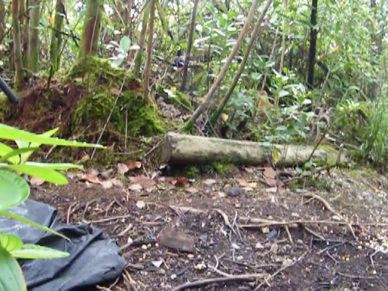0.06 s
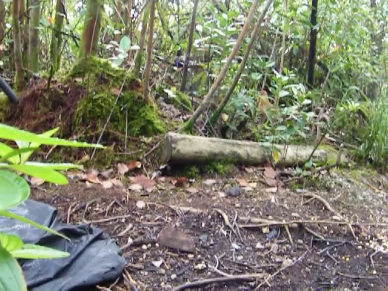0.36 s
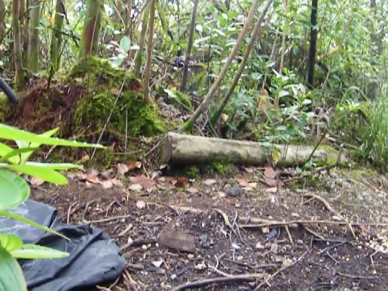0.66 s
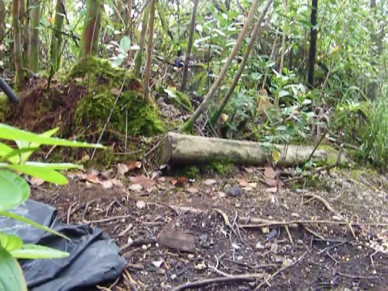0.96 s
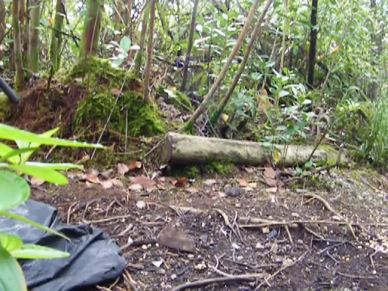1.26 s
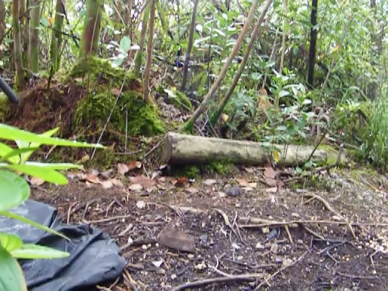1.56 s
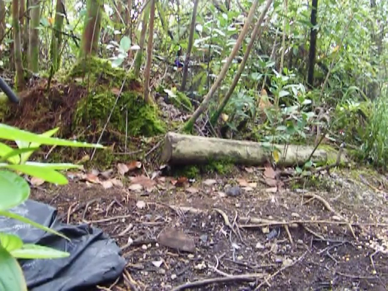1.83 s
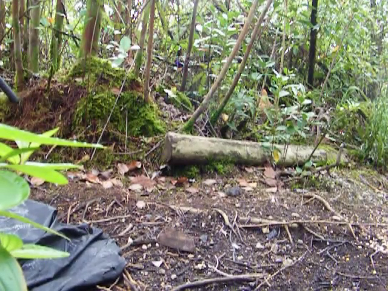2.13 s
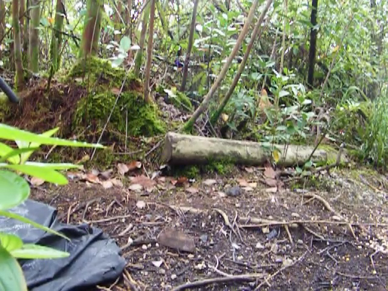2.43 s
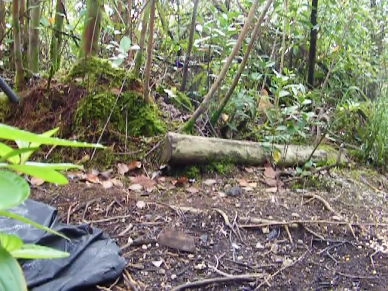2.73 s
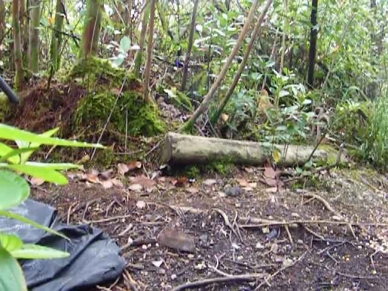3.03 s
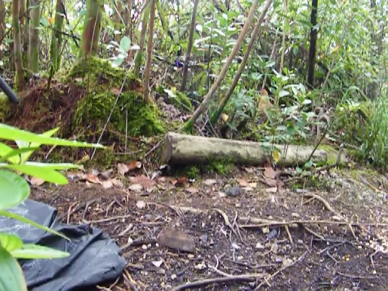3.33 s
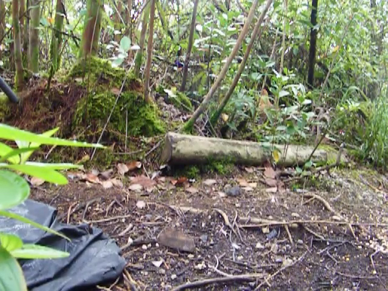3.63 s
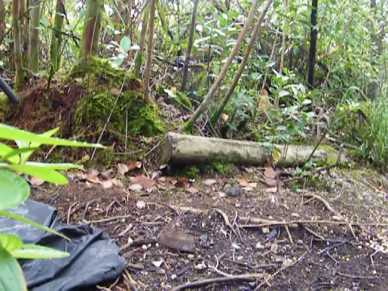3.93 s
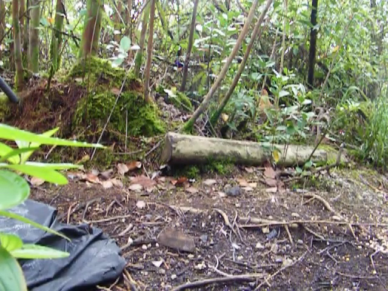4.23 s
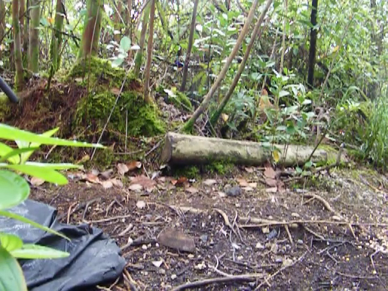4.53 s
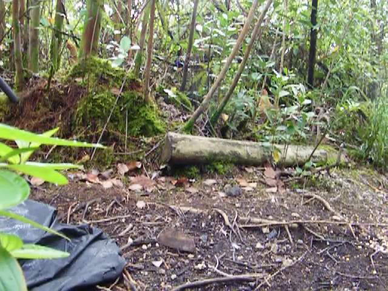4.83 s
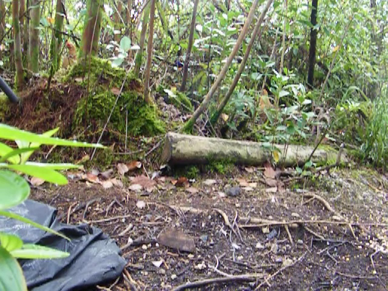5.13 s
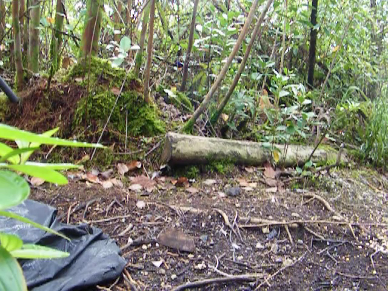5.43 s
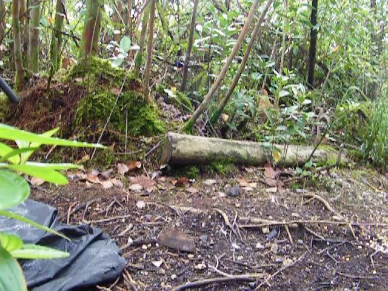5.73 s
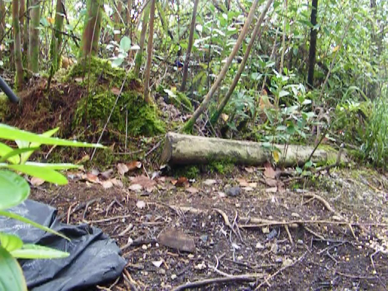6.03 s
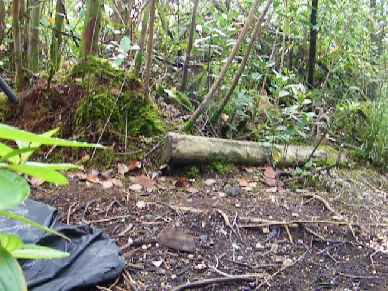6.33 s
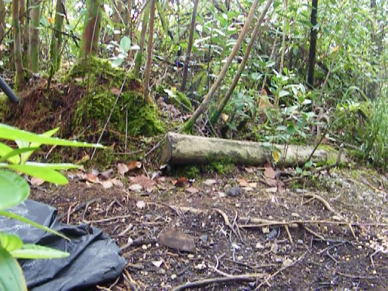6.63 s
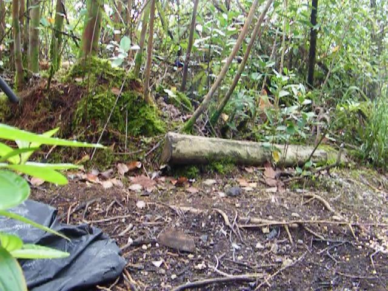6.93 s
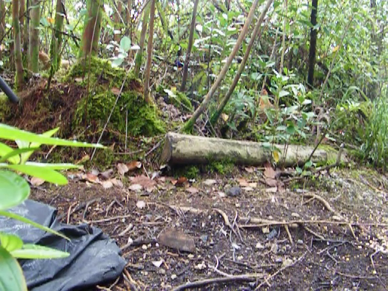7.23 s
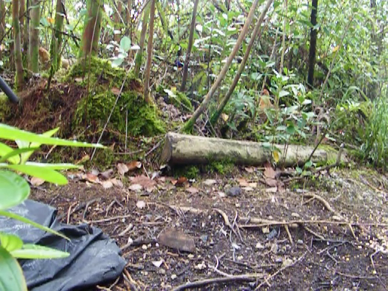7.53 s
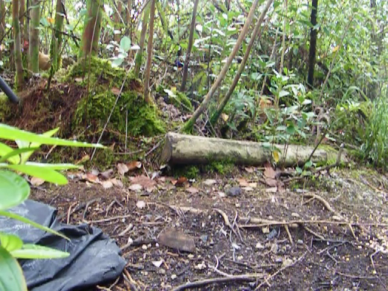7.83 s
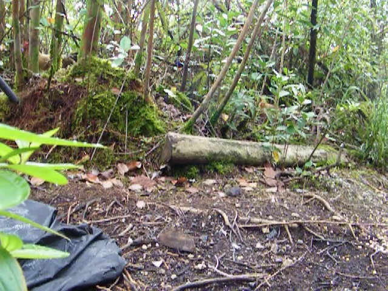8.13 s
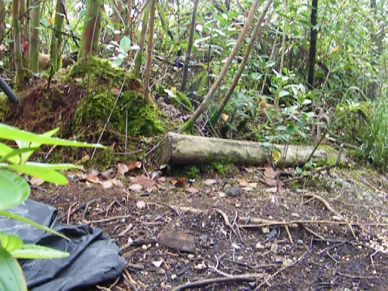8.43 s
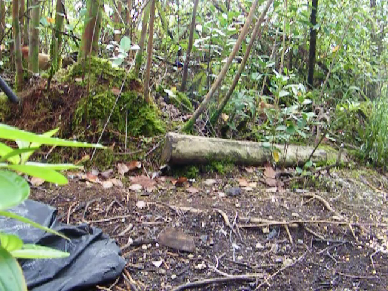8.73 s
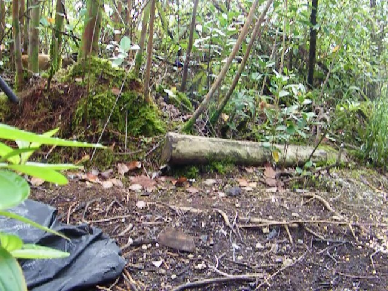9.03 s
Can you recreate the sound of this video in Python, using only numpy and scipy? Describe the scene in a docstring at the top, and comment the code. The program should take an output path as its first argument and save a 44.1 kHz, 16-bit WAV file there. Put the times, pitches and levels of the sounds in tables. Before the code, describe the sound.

Something rummages through dry leaves and twigs on a woodland floor, close to the microphone. Stalks snap in uneven bursts, each a bright crack with a hollow knock, while leaves scuff and crinkle and the soil takes an occasional soft thud. The activity is busy at first and thins out in the second half. Small birds whistle faintly far away, over a low rumble of air and a thin, steady high whine.

```python
"""A woodland floor, up close: something rummages through dry leaves and twigs.
Stalks give way in uneven bursts, each with a bright crack and a hollow knock. Leaves scuff and
crinkle with every push, and now and then the soil takes a soft thud.
Small birds whistle far off through the trees; still air and a thin high whine sit behind it all."""
import sys
import numpy as np
from scipy import signal
from scipy.fft import rfft, irfft, next_fast_len
from scipy.io import wavfile

SR = 44100
rng = np.random.default_rng(int(sys.argv[2]) if len(sys.argv) > 2 else 0)


def unload_audio(sound):
    """Save the sound as a 16-bit wav file, at the path given as the first command line argument."""
    columns = np.transpose(np.atleast_2d(sound))
    # keep every value between -1 and 1, then stretch to whole-number steps
    steps = np.round(np.clip(columns, -1, 1) * 32767)
    wavfile.write(sys.argv[1], SR, steps.astype(np.int16))


N = 404397
TIME = np.arange(N) / SR
BURST_TIME = np.arange(8192) / SR   # seconds within one short sound

# Tone of the still air, mostly low rumble. Each row: frequency in Hz, gain in dB.
AIR_EQ = [(20, -3.5), (45, 19.5), (66, 20.5), (100, 12.5), (330, 1.5), (530, -2.5), (700, -9.5), (820, 4.5),
          (1000, -4.5), (2000, -6), (5000, -4.5), (7700, -6), (9000, -7)]
# Tone of the whine, a narrow band near 6.4 kHz. Each row: frequency in Hz, gain in dB.
WHINE_EQ = [(4800, -40), (5600, -20), (5900, -13), (6150, -6), (6260, -4), (6335, 2), (6410, -5), (6475, 1),
            (6570, -3), (6660, -20), (7000, -45)]
# Distant bird notes. Each row: start in seconds, length in seconds, opening pitch in Hz,
# closing pitch in Hz, relative level in dB.
BIRD_NOTES = [(1.218, 0.07, 4970, 4340, -57), (1.466, 0.074, 5760, 4500, -58),
              (2.692, 0.089, 2730, 2938, -57), (5.39, 0.058, 5102, 4270, -61),
              (5.789, 0.21, 6380, 3986, -56), (6.017, 0.074, 2860, 3014, -54),
              (6.142, 0.12, 5540, 3540, -55), (7.505, 0.1, 4540, 4330, -60), (7.99, 0.073, 5120, 5200, -57),
              (8.057, 0.049, 5480, 5740, -55), (8.399, 0.14, 2647, 3022, -55.5)]
# Weight landing on the soil. Each row: start in seconds, relative level in dB, pitch in Hz.
SOIL_THUDS = [(1.599, -19, 130), (1.758, -22.5, 51.66), (2.287, -27, 159.2), (2.637, -23, 70.4),
              (3.31, -23, 54.4), (4.365, -13, 64.3), (4.603, -23, 99.3), (7.265, -21.5, 104.9)]
# Bass-heavy tone of the soil. Each row: frequency in Hz, gain in dB.
SOIL_EQ = [(20, -44.5), (45, 1), (62, 7.5), (120, 9.5), (200, -15), (600, -27.5)]
# Faint stirring between the pushes. Each row: time in seconds, relative level in dB.
STIRRING = [(0, -45), (1.5, -35), (2.4, -42.5), (3.6, -41.5), (4.4, -39), (5.15, -50.5), (5.8, -41.5),
            (7.3, -47.5), (8.05, -63), (9.17, -41.5)]
# Pushes through the leaf litter. Each row: start in seconds, length in seconds, relative level in dB.
PUSHES = [(0.02, 0.089, -31), (0.214, 0.099, -26.5), (0.396, .16, -30), (0.734, .2, -27.5),
          (1.13, 0.1, -26.5), (1.326, .16, -36), (1.533, 0.19, -32), (1.883, 0.2, -28.5),
          (2.145, 0.13, -34), (2.528, 0.19, -33), (2.836, 0.11, -37.5), (3.079, 0.13, -33.5),
          (3.214, .3, -29), (3.551, 0.24, -41.5), (3.97, 0.12, -35), (4.326, 0.093, -38.5),
          (4.546, 0.042, -34.5), (4.606, 0.13, -22), (5.383, .04, -42), (5.517, 0.078, -33),
          (5.604, 0.074, -29), (5.736, 0.088, -38), (6.065, .11, -36.5), (6.46, 0.14, -48),
          (6.917, 0.047, -28), (7.088, 0.047, -33), (7.374, 0.048, -36.5), (8.256, .07, -46.5),
          (8.482, 0.068, -43), (9.142, 0.024, -39)]
# Dry tone of crinkling leaves. Each row: frequency in Hz, gain in dB.
CRINKLE_EQ = [(1000, -15.5), (2000, -4.5), (2700, 1), (5000, -2), (5900, -10.5), (7600, -1.5), (9000, -9.5)]
# Hollow tone of the knocks and scuffs. Each row: frequency in Hz, gain in dB.
KNOCK_EQ = [(40, 4.5), (70, 7), (200, 0), (290, 0.5), (375, 3), (470, -1.5), (550, -0.5), (780, -1.5),
            (920, -7.5), (1220, -1), (1380, -4), (1650, -5), (1850, -10.5), (4000, -21.5)]
# Bright tone of the cracks. Each row: frequency in Hz, gain in dB.
CRACK_EQ = [(600, -25), (2050, -0.5), (2600, 4), (3300, -1), (4200, -4), (5000, -1.5), (5800, -4),
            (6800, 0), (7700, 2), (9000, 2)]
# The twig and leaf breaks that stand out. Each row: start in seconds, break time in seconds,
# relative knock level in dB, knock centre in Hz, relative crack level in dB.
FEATURED_BREAKS = [(0.039, 0.00074, -30, 1040, -25), (0.201, 0.004, -27.5, 590, -27.5),
                   (0.255, 0.00099, -25, 656, -20.5), (0.39, 0.016, -26, 505, -29.5),
                   (0.429, 0.0012, -20.5, 655, -28), (0.496, 0.0013, -39, 500, -24.5),
                   (0.609, 0.00049, -27.5, 1040, -27), (0.627, 0.00073, -23, 980, -17),
                   (0.76, 0.003, -23.5, 670, -44), (0.804, 0.00099, -40, 570, -26.5),
                   (0.87, 0.0012, -47, 400, -24), (0.879, 0.0035, -20.5, 490, -17),
                   (1.004, 0.003, -30.5, 970, -21.5), (1.04, 0.0025, -30, 620, -22),
                   (1.105, 0.00061, -31.5, 710, -24), (1.128, 0.0009, -39, 589.5, -27),
                   (1.313, .0015, -33.5, 610, -28.5), (1.329, 0.0014, -24, 790, -22),
                   (1.428, 0.0024, -26.5, 670, -28.5), (1.48, .0013, -34, 470, -32),
                   (1.581, 0.0014, -19, 561, -24.5), (1.598, 0.0013, -25.5, 608.7, -22),
                   (1.747, .0019, -30.5, 583, -24.5), (1.859, .0005, -32.5, 810, -23),
                   (1.886, 0.0022, -23.5, 680, -27), (1.939, 0.0011, -24.5, 1048, -26.5),
                   (1.969, 0.0019, -21.5, 745, -24), (1.985, .0024, -26, 685, -24),
                   (2.026, 0.0024, -20.5, 665, -14.5), (2.191, 0.015, -27, 470, -27.5),
                   (2.311, 0.002, -35, 800, -30.5), (2.401, 0.0031, -30.5, 630, -32.5),
                   (2.492, 0.009, -26.5, 626.5, -41), (2.638, 0.0051, -21, 537, -26),
                   (2.737, .018, -25.5, 450, -51), (3.065, 0.0017, -20.5, 630, -31.5),
                   (3.158, 0.0082, -23.5, 494.2, -24.5), (3.228, .0037, -25, 698, -24),
                   (3.245, 0.0028, -22, 878, -19), (3.312, 0.011, -22, 820, -23.5),
                   (3.383, 0.0025, -25.5, 1030, -31), (3.424, 0.0033, -27, 800, -29.5),
                   (3.559, 0.0015, -26.5, 510, -31), (3.611, 0.0025, -31, 735.2, -35.5),
                   (3.668, 0.0029, -26.5, 720, -36), (3.817, 0.0014, -17, 1020, -17.5),
                   (4.03, 0.0022, -18, 980, -15.5), (4.164, 0.0015, -36.5, 1140, -29.5),
                   (4.275, 0.0039, -31, 683, -24), (4.31, 0.011, -24, 630, -31.5),
                   (4.351, 0.0067, -18.5, 597, -23), (4.365, 0.0012, -21.5, 558.8, -34),
                   (4.597, 0.0046, -22, 790, -23), (4.641, 0.0011, -25.5, 590.4, -25),
                   (4.697, 0.0069, -24.5, 479.4, -46), (4.932, 0.011, -29, 512.8, -41),
                   (5.025, 0.0041, -29.5, 410, -41), (5.303, 0.012, -29, 475.6, -41),
                   (5.495, .0038, -31, 573.6, -30.5), (5.627, 0.00096, -28, 740, -19.5),
                   (5.698, 0.0016, -21.5, 611.4, -21), (5.905, 0.0062, -27.5, 624, -31),
                   (6.01, 0.0057, -28.5, 742, -27.5), (6.121, 0.0035, -25.5, 445.3, -53),
                   (6.238, 0.0012, -37.5, 1097, -25.5), (6.38, 0.009, -27, 710, -26.5),
                   (6.676, 0.0023, -32.5, 646.3, -24), (6.91, 0.0009, -24.5, 855.4, -18.5),
                   (6.982, 0.0012, -29.5, 540, -24.5), (7.007, 0.00075, -29, 650, -24),
                   (7.058, 0.001, -38, 610, -27.5), (7.21, 0.0012, -30, 531.2, -26),
                   (7.288, .0016, -32, 458, -55), (7.432, 0.00074, -28, 871, -30),
                   (7.489, 0.0019, -43, 1178, -29), (7.558, 0.0024, -31, 445, -50),
                   (7.674, 0.0013, -22.5, 960, -16.5), (7.699, 0.0007, -27, 960, -18),
                   (7.72, 0.0016, -22, 740, -17), (7.774, 0.00097, -36, 700, -25.5),
                   (7.802, 0.0055, -35.5, 725, -36.5), (7.914, 0.002, -44, 696, -48),
                   (8.179, 0.0019, -44, 406.7, -42), (8.41, 0.0035, -31, 820, -34),
                   (8.669, 0.0027, -41.5, 501.6, -63), (8.771, 0.012, -42.5, 760, -35),
                   (8.806, 0.0013, -26.5, 650, -33.5), (8.999, 0.008, -33.5, 564, -44.5),
                   (9.109, 0.00089, -45, 840, -25.5)]


def from_db(db):
    """Decibels to gain."""
    return 10 ** (np.asarray(db) / 20)


def unit_rms(x):
    """Scale to an rms of 1."""
    return x / np.sqrt(np.mean(x ** 2) + 1e-20)


def at_level(burst, db, samples=353):
    """Set a burst's gain by the rms level of its attack."""
    return from_db(db) * burst / np.sqrt(np.mean(burst[:samples] ** 2))


def add(track, start_s, sound):
    """Lay a sound into the track."""
    i = max(round(start_s * SR), 0)
    track[i:i + len(sound)] += sound[:max(N - i, 0)]


def drift(turns_per_s):
    """A smooth random modulator with an rms of 1."""
    knots = rng.standard_normal(int(turns_per_s * N / SR) + 2)
    return unit_rms(np.interp(TIME * turns_per_s, np.arange(len(knots)), knots))


def equalise(x, curve, centre_hz=1000, focus_db=0):
    """Minimum-phase EQ, so attacks stay sharp; focus_db is an extra cut one octave from the centre."""
    size = 2 * next_fast_len(len(x) // 2 + 1)
    octave = np.log2(np.maximum(np.arange(size // 2 + 1) * SR / size, 1))
    hz, db = np.transpose(curve)
    off_centre = np.log2(1 + (octave - np.log2(centre_hz)) ** 2)
    gain = from_db(np.interp(octave, np.log2(hz), db) - focus_db * off_centre)
    cepstrum = irfft(np.log(gain))
    cepstrum[1:size // 2] *= 2
    cepstrum[size // 2 + 1:] = 0
    return irfft(rfft(x, size) * np.exp(rfft(cepstrum)))[:len(x)]


def air_and_whine(air_db, whine_db):
    """The bed: still outdoor air and a steady, narrow band of high noise."""
    air = unit_rms(equalise(rng.standard_normal(N), AIR_EQ))
    whine = unit_rms(equalise(rng.standard_normal(N), WHINE_EQ))
    return from_db(air_db) * air + from_db(whine_db) * whine


def birds(gain_db, waver, scatter_s):
    """Thin, wavering whistles slide to their closing pitch and arrive mostly scattered by the trees."""
    direct = np.zeros(N)
    for start, length, open_hz, close_hz, db in BIRD_NOTES:
        progress = np.linspace(0, 1, int(length * SR))
        glide_hz = close_hz + (open_hz - close_hz) * (1 - progress) ** 2
        hz = glide_hz * (1 + waver * drift(180)[:len(progress)])
        swell = np.sqrt(np.abs(np.sin(np.pi * progress)))
        whistle = swell * np.sin(2 * np.pi * np.cumsum(hz) / SR)
        add(direct, start, from_db(db + gain_db) * unit_rms(whistle))
    trees = rng.standard_normal(len(BURST_TIME)) * np.exp(-BURST_TIME / scatter_s)
    scattered = signal.fftconvolve(direct, trees / np.sqrt(np.sum(trees ** 2)))[:N]
    return 0.5 * direct + scattered


def fracture(decay_s, tail_db, tail_s, swell, grit):
    """A run of tiny uneven slips that builds and dies, then a softer tail as the litter settles."""
    run = np.exp(-BURST_TIME / decay_s) * (1 - np.exp(-BURST_TIME / (swell * decay_s)))
    settling = from_db(tail_db) * np.exp(-BURST_TIME / tail_s)
    steps = rng.standard_normal(len(BURST_TIME) // 64).clip(-2, 2)
    roughness = np.exp(grit * np.repeat(steps, 64))
    slips = unit_rms(roughness) * rng.standard_normal(len(BURST_TIME))
    return (run + settling) * slips


def soil_thuds(gain_db):
    """Soft soil answers a weight in the bass: a dull crunch and a few dying swings."""
    track = np.zeros(N)
    for start, db, hz in SOIL_THUDS:
        swing = np.sin(2 * np.pi * hz * BURST_TIME) * np.exp(-BURST_TIME / 0.036)
        crunch = fracture(decay_s=0.0049, tail_db=-24, tail_s=0.024, swell=0.33, grit=0.17)
        thud = unit_rms(swing) + unit_rms(equalise(crunch, SOIL_EQ))
        add(track, start, at_level(thud, db + gain_db, samples=1000))
    return track


def push_envelope(attack_s, release_s):
    """How hard the litter is stirred, as a gain: each push builds quickly, holds and lets go."""
    t = TIME[::64]
    power = from_db(np.interp(t, *np.transpose(STIRRING))) ** 2
    for start, length, db in PUSHES:
        fade = np.maximum(start - t, 0) / attack_s + np.maximum(t - start - length, 0) / release_s
        power += (from_db(db) * np.exp(-fade)) ** 2
    return np.interp(TIME, t, np.sqrt(power))


def grains(per_s, spread_db, clump_db, clumps_per_s):
    """Random clicks, most small and a few large, swelling in clumps."""
    clumps = from_db(clump_db * drift(clumps_per_s).clip(-2, 1.5))
    sizes = from_db(spread_db * np.minimum(rng.exponential(1, N), 4))
    hits = rng.random(N) < per_s / SR
    return hits * clumps * sizes * rng.choice([-1, 1], N)


def leaf_rustle(envelope, scuff_db, crinkle_db):
    """Leaves slide and crumple: dull scuffs of four sizes under a fine dry crinkle."""
    scuffs = np.zeros(N)
    for hz in np.geomspace(160, 750, 4):
        coarse = grains(per_s=820, spread_db=3.5, clump_db=7, clumps_per_s=62)
        scuffs += equalise(coarse, KNOCK_EQ, hz, focus_db=7.5)
    nudges = from_db(1.56 * drift(45).clip(-2, 1.5))   # one nudge moves all sizes together
    fine = grains(per_s=5000, spread_db=4.5, clump_db=8, clumps_per_s=91)
    crinkle = unit_rms(equalise(fine, CRINKLE_EQ) * np.sqrt(nudges))
    return envelope * (from_db(scuff_db) * unit_rms(scuffs * nudges) + from_db(crinkle_db) * crinkle)


def small_breaks(per_s):
    """Little pieces give way unevenly during each push and follow its level; rows as FEATURED_BREAKS."""
    rows = []
    for start, length, push_db in PUSHES:
        count = max(round(per_s * length), 1)
        for onset in start + length * (np.arange(count) + rng.random(count)) / count:
            size, dryness = rng.standard_normal(2).clip(-2, 2)
            knock_db = push_db - 3 + 2.5 * size
            hardness_db = -5 + 4 * dryness   # crack level over knock level
            break_s = 0.0015 * 2 ** (-0.2451 * hardness_db)   # a harder piece parts sooner
            knock_hz = 630 * 2 ** (0.3 * hardness_db)   # and knocks higher
            rows.append((onset, break_s, knock_db, knock_hz, knock_db + hardness_db))
    return rows


def ringing(burst, hz, cycles, mix):
    """The broken piece rings for a few cycles near its own pitch, blended under the burst."""
    angle = 2 * np.pi * hz * 2 ** rng.normal(0, 0.38) / SR
    radius = np.exp(-angle / (2 * np.pi * cycles))
    ring = signal.lfilter([1, 0, -1], [1, -2 * radius * np.cos(angle), radius ** 2], burst)
    return unit_rms(burst) + mix * unit_rms(ring)


def knock(break_s, centre_hz):
    """The hollow body of a break; a slow crumple keeps it going longer."""
    slips = fracture(decay_s=0.0061 + 1.22 * break_s, tail_db=-9, tail_s=0.018, swell=0.11, grit=0.16)
    return equalise(slips, KNOCK_EQ, centre_hz, focus_db=3.5)


def crack(break_s, typical_hz=4023, spread_octaves=0.11):
    """The bright edge of a break: fibres part and the piece rings, no two alike."""
    hz = typical_hz * 2 ** (spread_octaves * rng.standard_normal())
    slips = fracture(decay_s=1.4 * break_s, tail_db=-20, tail_s=0.018, swell=0.074, grit=0.49)
    slips[0] += 3.87   # the first fibre's click: clear in a quick break, buried in a slow one
    return equalise(ringing(slips, hz, cycles=6.3, mix=0.068), CRACK_EQ, hz, focus_db=10)


def snaps(breaks, knock_gain_db, crack_gain_db):
    """Each break layers a crack over a knock: twigs part at once, leaves crumple slowly."""
    track = np.zeros(N)
    for start, break_s, knock_db, knock_hz, crack_db in breaks:
        body = at_level(knock(break_s, knock_hz), knock_db + knock_gain_db)
        edge = at_level(crack(break_s), crack_db + crack_gain_db)
        add(track, start, body + edge)
    return track


def scene():
    """The mono mix, back to front: air and birds, soil and leaves, then the snapping stalks."""
    woods = air_and_whine(air_db=-45, whine_db=-44) + birds(gain_db=6, waver=0.02, scatter_s=0.033)
    envelope = push_envelope(attack_s=0.012, release_s=0.028)
    ground = soil_thuds(gain_db=-5) + leaf_rustle(envelope, scuff_db=-3, crinkle_db=-15.5)
    stalks = snaps(FEATURED_BREAKS + small_breaks(per_s=38), knock_gain_db=3, crack_gain_db=-0.03)
    return (woods + ground + stalks)[None]


def record(dry, mic_edge_hz=8000, overload=0.72, top_cut_hz=16000):
    """A narrow-band microphone: the hardest cracks overload it, and a steep low-pass trims the top."""
    narrow = signal.sosfilt(signal.butter(22, mic_edge_hz, fs=SR, output="sos"), dry)
    clipped = np.clip(narrow, -overload, overload)
    return signal.sosfilt(signal.ellip(8, 0.1, 70, top_cut_hz, fs=SR, output="sos"), clipped)


dry = scene()
out = record(dry)
unload_audio(out)
```